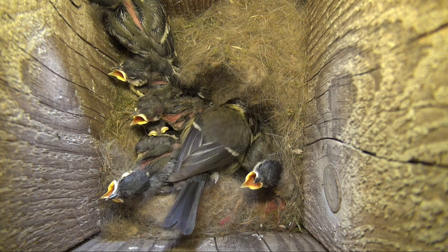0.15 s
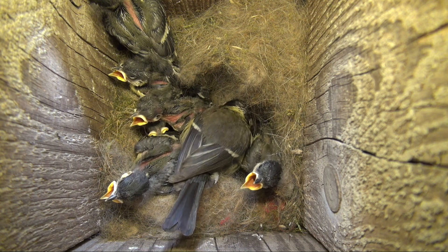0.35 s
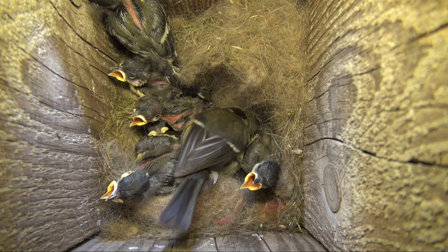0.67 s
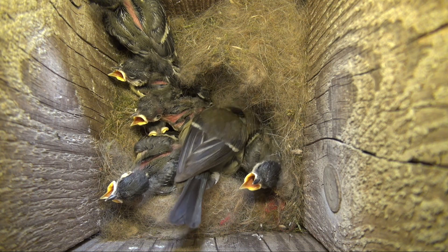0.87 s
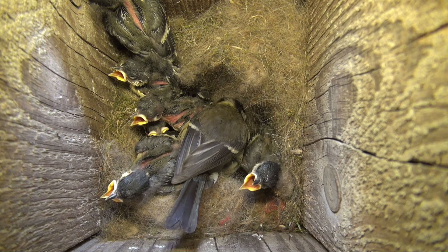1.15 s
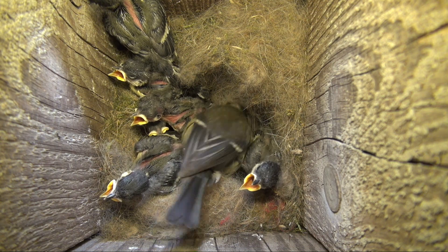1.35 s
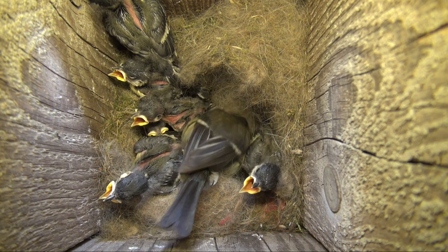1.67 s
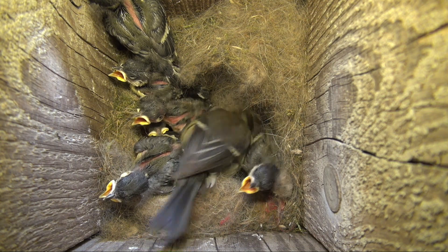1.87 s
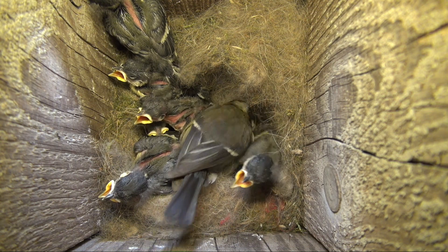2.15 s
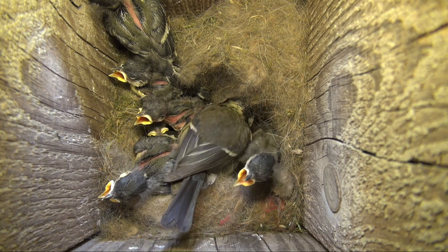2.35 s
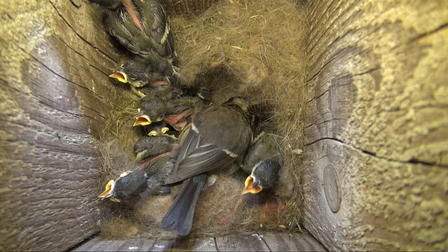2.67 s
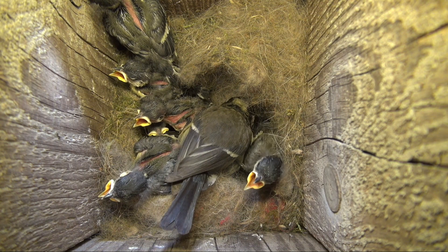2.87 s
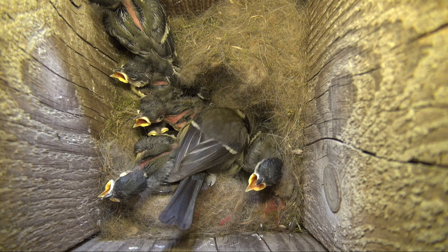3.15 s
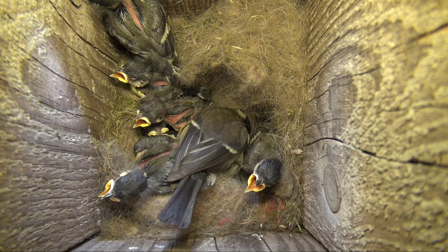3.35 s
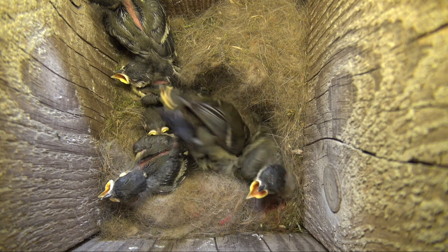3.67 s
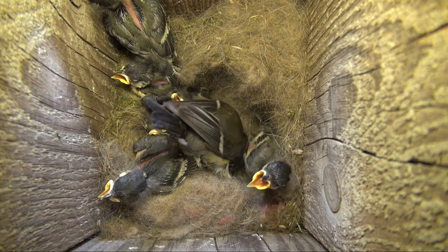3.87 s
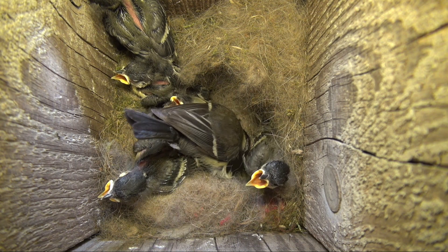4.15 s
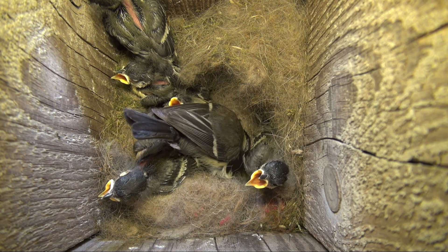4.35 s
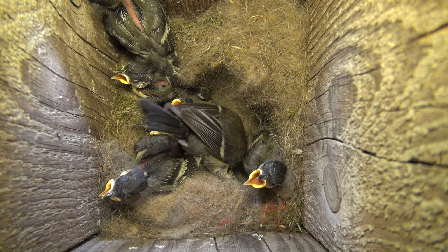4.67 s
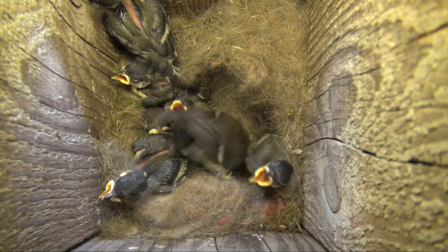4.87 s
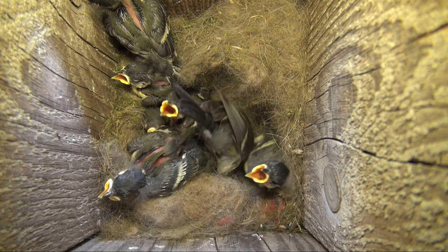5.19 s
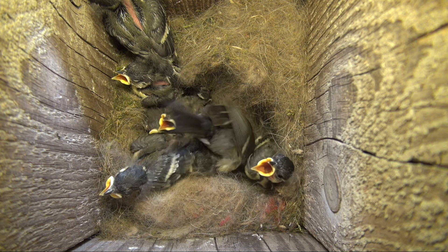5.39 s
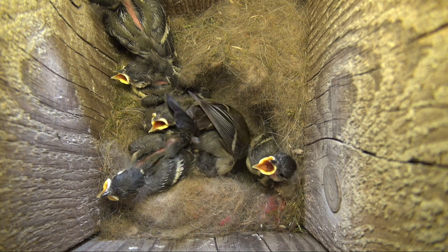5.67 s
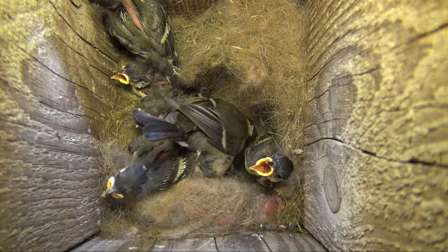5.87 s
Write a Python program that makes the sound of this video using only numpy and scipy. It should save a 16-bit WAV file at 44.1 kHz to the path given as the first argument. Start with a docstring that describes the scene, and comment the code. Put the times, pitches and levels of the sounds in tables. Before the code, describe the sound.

Loud begging starts immediately in a close, dry wooden nest box. A rasping cheep of about 0.3 seconds opens, joined at 0.1 by a brighter, higher trill and a faint feather rustle. Sharp two-toned cheeps around 6 kHz continue at 0.4, 0.9, 1.05 and 1.25, with more high trills at 0.5 and 1.0 and a thin peep near 1.15. A longer buzzy call comes at 1.5, then short calls from 1.9 to 2.9, one stretched at 2.3. A weaker trill sounds at 3.1; after a small gap, calls resume at 3.5 with another trill and soft rustle. Airy peeps appear near 4.1, 4.7, 5.3 and 5.8. Clean cheeps cluster from 4.4, a long rasp follows at 5.1 with a rustle, and final cheeps and a rough trill close at 5.5 to 5.8. Throughout, a faint engine-like hum throbs about twenty times a second over low rumble and slight hiss.

```python
"""From the first instant nestlings beg in a wooden nest box, right under a stereo microphone.
Each loud call is two whistles from the two sides of the syrinx: they beat, split apart and break into a rasp.
A higher chick soon trills with a swinging upper voice, and the parent shifts with a grainy noise rustle.
After a second a weak chick adds thin, airy peeps; the calls and rustles return to the end.
All along, something like an idling engine hums and throbs outside, over low rumble and faint hiss."""
import sys
import numpy as np
from scipy import signal
from scipy.fft import rfft, irfft, next_fast_len
from scipy.io import wavfile
from scipy.ndimage import uniform_filter1d, minimum_filter1d, map_coordinates

SR = 44100
rng = np.random.default_rng(int(sys.argv[2]) if len(sys.argv) > 2 else 0)


def digitize_waveform(pressure):
    """Quantize a signal to 16-bit integers and store it at the path in sys.argv[1].

    Rows of a 2-D input are taken as channels; values are limited to [-1, 1].
    """
    field = np.atleast_2d(pressure).T
    bounded = np.clip(field, -1, 1)
    quanta = np.round(bounded * 32767).astype(np.int16)
    wavfile.write(sys.argv[1], SR, quanta)


N = 265923  # samples

# begging calls: (start [s], length [s], base pitch [Hz], pitch drift over the call [Hz], base level [dB],
#   swell over the call [dB], opening scoop [Hz], pure opening [s], base gap down to the second voice [Hz],
#   base roughness [0-1], screech after the start [s], screech half length [s], screech extra gap [Hz],
#   low closing hook [s])
BEG_CALLS = [ (0.006, 0.28, 6584, 245, -17, -2.5, 599, 0.01067, 258.2, .3, 0.066, .045, 201.8, 0),
             (0.405, 0.11, 6080, 204, -18, -3, 597, 0.01625, 292, 0.5, .055, 0.0083, 500, 0.0063),
             (0.86, 0.12, 6350, -200, -18, -4.5, 402, 0.023, 388, 0.7, .06, .028, 453, 0),
             (1.057, 0.104, 6240, -300, -16.5, 14, 700, 0.0044, 400, 0.45, .012, 0.013, 150, 0.0031),
             (1.261, 0.099, 6100, 151.5, -16.5, 3, 397.5, .008, 402, 0.46, .013, 0.005, 392, 0.013),
             (1.472, 0.3, 6600, 98.5, -18.5, -1.5, 3, .008, 282.3, 0.29, 0.061, .06, 297.4, 0.0016),
             (1.928, 0.13, 6340, -9, -17.5, 2.5, 792, 0.01, 472, 0.5, 0.024, .008, 581, 0.0017),
             (2.19, 0.11, 6260, 145, -13.5, 8, 502.5, 0.014, 157.6, 0.4, 0.093, 0.011, 415, 0.00026),
             (2.283, 0.2547, 6510, 548, -18.5, 9.5, 3, .002, 316.7, .2, .01, 0.0255, 391, 0.0022),
             (2.717, 0.08, 6210, 502, -14.5, 13, 401.5, 0.017, 161, .3, .024, .005, 200, 0.0071),
             (2.897, 0.086, 6136, 94, -15.5, -1.5, 791, .007, 291, 0.37, 0.023, .007, 385, 0.013),
             (3.463, 0.13, 6796, 93.5, -19.5, -7, 398.5, .012, 500, 0.7, .05, 0.036, 206, 0.0021),
             (3.653, 0.16, 6180, 148.5, -20, -1, 160, .009, 230, 0.41, .097, .024, 361, 0.0013),
             (3.930, 0.14, 6230, -150, -14, -2.5, 360.5, .022, 111, 0.14, .11, 0.018, 455, 0.0031),
             (4.433, 0.099, 6520, -300, -17, 11.5, 107, .006, 345, 0.03, .042, .018, 199, 0.00026),
             (4.619, 0.099, 6200, -200, -17, 10.5, 97.5, 0.0038, 328, 0.21, 0.01, 0.0098, 339, 0.0037),
             (4.804, 0.097, 6205, -100, -15.5, 8.5, 143, .009, 399, 0.16, .018, 0.0062, 524, 0.0032),
             (5.049, 0.070, 6020, -200, -21.5, 0.5, 401, 0.0033, 134, .25, .016, 0.0034, 200, 0.0025),
             (5.104, 0.24, 6663, 307, -17.5, 7, -4, 0.0016, 280, 0.23, 0.044, .04, 206.8, 0.0021),
             (5.489, 0.088, 6310, 503.5, -15, -6, 800.5, 0.012, 203.5, .35, .025, .008, 410, .009),
             (5.667, 0.11, 6150, -250, -13.5, 1.5, 394, .008, 333, 0.14, .088, .012, 150, 0.0061), ]
# trilled calls: (start [s], length [s], base pitch [Hz], pitch drift [Hz], base level [dB], swell [dB],
#   base gap down to the second voice [Hz], base roughness [0-1], slow swings [per s])
TRILL_CALLS = [ (0.075, 0.15, 8330, -300, -12, -4, 1367, 0.48, 7.1),
               (0.522, 0.15, 8190, -100, -16, -8, 1166, 0.23, 8.8),
               (0.974, 0.12, 8370, -150, -15.5, -1.5, 1160, 0.32, 26),
               (3.123, 0.12, 8600, 97.5, -21.5, -3.5, 1736, 0.01, 14.4),
               (3.477, 0.13, 8800, -200, -23.5, -7, 1834, .6, 11),
               (4.435, 0.1, 8570, 297, -22.5, -11, 1820, 0.3, 15.2),
               (5.711, 0.13, 8200, -1300, -23.5, 4.5, 743, 1, 8.6), ]
# thin single-voiced peeps: (start [s], length [s], base pitch [Hz], pitch drift [Hz], base level [dB],
#   swell [dB], roughness at the start [0-1])
PEEP_CALLS = [ (1.157, 0.082, 6940, -550, -41, -7, 0.3), (4.058, 0.174, 7250, -3.5, -38, 4.5, 0.7),
              (4.71, 0.09, 7180, -500, -36.5, 5.5, 0.5), (5.345, 0.066, 7530, -400, -44, 0.5, 0.8),
              (5.838, 0.098, 7590, 101.5, -37, 0.5, 0.4), ]
# forced hard, the two voices are pulled wide apart:
#   (widest at [s], build-up [s], extra gap [Hz], change of level [dB])
VOICE_SPLITS = [(0.508, 0.039, 1990, 2), (1.158, 0.017, 2400, -11.5), (1.548, .016, 992, 0),
                (2.028, 0.035, 1936, -3), (3.738, .007, 615, 7), (5.565, 0.028, 1900, -8)]
# air rushing through the open beak: (frequency [Hz], relative density [dB per Hz])
BEAK_AIR = [(1200, -15), (2600, -13), (3300, -5.5), (4200, -4.5), (5000, -8.5), (5700, 3.5), (6700, 4),
            (7900, 7.5), (8800, -5.5), (9700, -2.5), (10600, -11.5), (12300, -11.5), (13400, -49),
            (14600, -67)]
# how the box colours the loud chicks on the way to the microphone: (frequency [Hz], gain [dB])
BOX_COLOUR = [(4500, -4.5), (5050, -3), (5650, -1.5), (7100, 2.5), (7400, 0.5), (7700, 3), (13300, -13),
              (14400, -23.5)]
# the loud chicks turn their heads: (time [s], left minus right [dB])
HEAD_TURNS = [(4.2, 1.5), (5.399, 0)]
# the box walls give each capsule its own pattern of standing waves:
# (frequency [Hz], left minus right [dB])
CAPSULE_BALANCE = [(2800, -2.5), (3800, -0.6), (4400, -0.5), (5300, 0), (5780, -5.5), (6100, 1),
                   (6750, 0.5), (7600, 4), (8700, -0.5), (11000, 3), (11800, -6), (12900, 0.5)]
# (frequency [Hz], lead of the left capsule [radians])
CAPSULE_LEAD = [(2000, -11), (3300, -1.62), (5000, 1.1), (5850, .5), (6250, 1.31), (7200, 0.87),
                (8600, 1.15), (10600, 1.27), (12000, 0.2), (13200, 2.4), (14000, 1.5)]
# the parent shifts: (time [s], half length [s], level [dB])
PARENT_SHIFTS = [(0.119, 0.084, -45), (3.495, 0.038, -47.5), (5.165, 0.056, -46.5)]
# engine tones and a faint whine: (frequency [Hz], relative level [dB])
ENGINE_TONES = [(45, -65.5), (90, -56), (134.6, -51), (177, -50.5), (195, -51.5), (299, -56), (490, -54.5),
                (568, -56), (2900, -69)]
# resonances that the engine's puffs ring: (frequency [Hz], width [Hz], relative level [dB])
THROB_RESONANCES = [(495, 13, -39.5), (568.2, 23, 12.5), (655, 80, -42.5), (1047, 23.3, 4)]
# rise and fall of the engine: (time [s], relative hum level [dB], relative throb level [dB])
ENGINE_LEVELS = [(0.3, -46, -49.5), (1.59, -42, -45.5), (2.51, -45.5, -50), (5.46, -42.5, -43.5),
                 (5.52, -47.5, -51), (5.7, -42.5, -45)]
# outdoor background: (frequency [Hz], relative density [dB per Hz])
OUTDOOR_SPECTRUM = [(25, -8), (60, -8.5), (130, -3), (200, -1.5), (370, -15), (650, -7), (900, -20),
                    (1250, -20), (2300, -29), (2900, -23.5), (4500, -33.5), (8000, -35.5), (12500, -40.5),
                    (15500, -43)]
# how alike left and right are outdoors: (frequency [Hz], likeness [0-1])
OUTDOOR_LIKENESS = [(25, 0.68), (60, 0.91), (150, .97), (400, .95), (600, .97), (1200, .95), (3000, 0.9),
                    (6000, .75), (12000, .5)]

ATTACK_S = 0.0025  # a voice starts and stops within this time
SCOOP_S = .012  # a begging call slides from its scoop to its pitch
OPENING_DB = -2.5  # it opens as one pure, softer whistle, before the second voice comes in
FALL_HZ, FALL_S = 844, 0.012  # the pitch falls as the air runs out
RELEASE_DB, RELEASE_S = 19.5, 0.0081  # and so does the level
# a screech: roughness, loss of level, share of its gap that lifts the upper voice
SCREECH_ROUGH, SCREECH_DIP_DB, SCREECH_LIFT = 1, 1, 0.83
# some begging calls end by snapping to a low register, which fades down to HOOK_DB
HOOK_HZ, HOOK_DB, HOOK_FADE_DB_PER_S = 4495, -29.5, 501.5
# a split: share taken by the upper voice, time held at the widest, gap scale over which the voices clear
SPLIT_LIFT, SPLIT_HOLD_S, SPLIT_CLEAR_HZ = 0.96, .003, 1700
# uneven breath pressure: a push is higher, louder and cleaner (sizes per unit of push)
WARBLE_RATE, WARBLE_HZ, WARBLE_DB, WARBLE_ROUGH = 75, 109.5, 2.08, 0.27
# the two voices drift against each other: share of their gap, random turns a second
GAP_WAVER, GAP_WAVER_RATE = .22, 70
DOUBLING_THRESHOLD, DOUBLING_FITS = 1.236, .25  # strain where the period doubles, and its random swing
AIR_PULSING = 0.3  # share of the rushing air that pulses with the beats of the voices
# a trill: slow swing and the lower voice's share of it, weaker ends, closing fall
SWING_HZ, SWING_LOWER, TRILL_ARCH_DB, TRILL_FALL_HZ = 337, .5, 1, 1305
# it starts weaker and rougher, and roughens at the bottom of each swing
TRILL_ONSET_S, TRILL_ONSET_DB, TRILL_STRAIN = .018, -3.5, .35
# a peep is lower and weaker at both ends, and loses this share of its roughness
PEEP_ARCH_HZ, PEEP_ARCH_DB, PEEP_CLEARS = 300, 0.5, 1
TOP_HZ = 15800  # nothing is kept from here up


def amp(db):
    """Decibels to gain."""
    return 10 ** (np.asarray(db) / 20)


def unit(x):
    """Scale to rms 1."""
    return x / np.sqrt(np.mean(np.abs(x) ** 2) + 1e-20)


def along(points, hz):
    """Read (frequency [Hz], value) points on a log axis."""
    f, v = np.transpose(points)
    return np.interp(np.log(hz + 1), np.log(f + 1), v)


def wobble(rate, size):
    """A smooth random curve, rate knots a second."""
    knots = rng.standard_normal(int(size * rate / SR) + 4)
    return map_coordinates(knots, [1 + np.arange(size) * rate / SR])


def filtered(x, response):
    """x times a complex response of frequency."""
    n = x.shape[-1]
    m = next_fast_len(n + 8192)
    spectrum = rfft(x, m) * response(np.fft.rfftfreq(m, 1 / SR))
    return irfft(spectrum, m)[..., :n]


def turns(hz):
    """Running phase, in radians, of a moving frequency."""
    return 2 * np.pi * np.cumsum(hz) / SR


def span(start, length):
    """For each sample of a call: seconds since its start, seconds left, and its place from -1/2 to 1/2."""
    age = np.arange(round(length * SR)) / SR
    return age, length - age, age / length - .5


def whistle(hz, rough, jitter_hz=240, chaos_rate=1100):
    """One side of the syrinx: a complex sine that flutters and, when forced, turns chaotic."""
    n = len(hz)
    jitter_rate, most_chaos = 400, .55
    phase = turns(hz + jitter_hz * rough * wobble(jitter_rate, n))
    share = most_chaos * rough ** 2
    swirl = unit(wobble(chaos_rate, n) + 1j * wobble(chaos_rate, n))
    return (np.sqrt(1 - share) + np.sqrt(share) * swirl) * np.exp(1j * phase)


def beak_air(voice):
    """Turbulent air in the open beak: shaped noise that flutters and partly pulses with the voice."""
    n = len(voice)
    hiss = filtered(rng.standard_normal(n), lambda hz: amp(along(BEAK_AIR, hz)))
    pulsing = 1 - AIR_PULSING + AIR_PULSING * np.abs(voice) ** 2
    return unit(hiss * amp(1.8 * wobble(300, n)) * pulsing)


def call(start_s, pitch, gap, db, rough, second_db, rasp_db, overtone_db, trill_hz, trill_depth_hz,
         undertone_db=-40, lock_hz=300, split_hz=520):
    """One call, placed in time: two voices, their undertone and overtones, and rushing air."""
    n = len(pitch)
    t = np.arange(n) / SR
    rough = np.clip(rough, 0, 1)
    # the muscles quiver: pitch warbles unevenly, and at each low point the voice weakens and roughens
    quiver = np.sin(turns(trill_hz * (1 + .2 * wobble(40, n))))
    push = wobble(WARBLE_RATE, n) * np.sqrt(2 * rough)
    trill = trill_depth_hz * quiver + WARBLE_HZ * push
    gain = amp(db + 2 * quiver * np.sqrt(rough) + WARBLE_DB * push)
    rough = np.clip(rough * (1 - quiver / 4 - WARBLE_ROUGH * push), 0, 1)
    # close in pitch the two sides lock into one tone; apart, they beat
    gap = gap + GAP_WAVER * np.minimum(gap, split_hz) * wobble(GAP_WAVER_RATE, n)
    second = amp(second_db) * np.minimum(np.abs(gap) / lock_hz, 1)
    voice = whistle(pitch + trill, rough) + second * whistle(pitch - gap + trill / 2, rough ** 2)
    # the shared airflow saturates, which sets side tones one gap above and below
    voice = unit(voice / (np.abs(voice) ** 2 + .3) ** .14)
    # pulled apart, the voices double their period in fits: a line an octave down
    strain = gap / split_hz + rough / 2
    fits = DOUBLING_FITS * wobble(WARBLE_RATE, n)
    doubling = np.clip(strain - DOUBLING_THRESHOLD + fits, 0, 1) * amp(1.5 * wobble(110, n))
    voice = voice + amp(undertone_db) * doubling * whistle(pitch / 2 + trill, rough / 2)
    # all these tones mix into a ragged band of overtones
    ragged = whistle(np.zeros(n), np.sqrt(rough))
    voice = voice + amp(overtone_db) * (rough + 1) / 2 * voice ** 2 * ragged
    rasp = amp(rasp_db) * rough * beak_air(voice)
    edges = np.clip(np.minimum(t, t[-1] - t) / ATTACK_S, 0, 1)
    sound = (np.sqrt(2) * voice.real + rasp) * gain * edges
    return np.pad(sound, (max(round(start_s * SR), 0), N))[:N]


def split(t):
    """Extra gap [Hz] between the voices and change of level [dB]: the gap builds up, then snaps shut."""
    gap, level_db = 0, 0
    for widest_s, build_s, extra_hz, change_db in VOICE_SPLITS:
        since = t - widest_s
        opening = np.exp(-(np.minimum(since, 0) / build_s) ** 2)
        gap = gap + extra_hz * opening * (t < widest_s + SPLIT_HOLD_S)
        level_db = level_db + change_db * np.exp(-(since / build_s) ** 2)
    return gap, level_db


def beg_shape(start, length, hz, drift_hz, level_db, swell_db, scoop_hz, pure_s, gap_hz, roughness,
              screech_s, screech_half_s, screech_hz, hook_s):
    """A begging call's pitch, gap, level, roughness: pure scoop, two-voiced hold with screech, fall."""
    age, left, place = span(start, length)
    opened = 1 - np.exp(-(age / pure_s) ** 6)
    screech = np.exp(-((age - screech_s) / screech_half_s) ** 2)
    apart, split_db = split(start + age)
    closing = np.exp(-np.maximum(left - hook_s, 0) / FALL_S)
    pitch = hz + drift_hz * place + scoop_hz * np.exp(-age / SCOOP_S) - FALL_HZ * closing
    pitch = pitch + SCREECH_LIFT * screech_hz * screech + SPLIT_LIFT * apart
    gap = opened * (1 - closing) * (gap_hz + screech_hz * screech) + apart
    rough = opened * (roughness + (SCREECH_ROUGH - roughness) * screech)
    rough = rough * np.exp(-(apart / SPLIT_CLEAR_HZ) ** 2)  # far apart, the voices clear
    db = level_db + swell_db * place + OPENING_DB * (1 - opened) - SCREECH_DIP_DB * screech + split_db
    db = db - RELEASE_DB * np.exp(-(left - hook_s / 2) / RELEASE_S)
    # a hook too short to sound is skipped
    hook = (left < hook_s) & (hook_s > ATTACK_S)
    pitch = np.where(hook, HOOK_HZ, pitch)
    gap = np.where(hook, 0, gap)
    db = np.where(hook, HOOK_DB + HOOK_FADE_DB_PER_S * left, db)
    return pitch, gap, db, rough


def beggars():
    """The loud chicks near 6.5 kHz: paired syrinx voices from clean whistle to screech."""
    x = sum(call(row[0], *beg_shape(*row), second_db=-5.5, rasp_db=-8, overtone_db=-15.5,
                 trill_hz=51.8, trill_depth_hz=72, undertone_db=-13.5) for row in BEG_CALLS)
    x = filtered(x, lambda hz: amp(along(BOX_COLOUR, hz)))
    lean_db = np.interp(np.arange(N) / SR, *np.transpose(HEAD_TURNS))
    return x * amp(1.03 + np.array([lean_db, -lean_db]) / 2)


def trill_shape(start, length, hz, drift_hz, level_db, swell_db, gap_hz, roughness, swing_rate):
    """A trilled call: the upper voice swings over a steadier lower one, and both fall at the end."""
    age, left, place = span(start, length)
    swing = np.cos(2 * np.pi * swing_rate * age)
    onset = np.exp(-(age / TRILL_ONSET_S) ** 4)
    closing = np.exp(-left / FALL_S)
    pitch = hz + drift_hz * place + SWING_HZ * swing - TRILL_FALL_HZ * closing
    gap = (gap_hz + (1 - SWING_LOWER) * SWING_HZ * swing) * (1 - closing / 2)
    db = level_db + swell_db * place + TRILL_ONSET_DB * onset
    db = db - TRILL_ARCH_DB * (2 * place) ** 2 - RELEASE_DB * np.exp(-left / RELEASE_S)
    return pitch, gap, db, roughness + TRILL_STRAIN * (onset + (1 - swing) / 2)


def triller(beak_hz=9700):
    """A higher chick whose upper voice warbles quickly."""
    x = sum(call(row[0], *trill_shape(*row), second_db=-5.5, rasp_db=-14.5, overtone_db=-35.5,
                 trill_hz=42.74, trill_depth_hz=250) for row in TRILL_CALLS)
    return filtered(x, lambda hz: 1 / (1 + (hz / beak_hz) ** 20))  # its beak passes little above the trill


def peep_shape(start, length, hz, drift_hz, level_db, swell_db, roughness):
    """A peep: one voice in a shallow arch, airy at first and clearer at the end."""
    age, left, place = span(start, length)
    ends = (2 * place) ** 2
    pitch = hz + drift_hz * place - PEEP_ARCH_HZ * ends
    db = level_db + swell_db * place - PEEP_ARCH_DB * ends
    return pitch, 0, db, roughness * (1 - PEEP_CLEARS * age / length)


def peeper():
    """A weak chick with one thin, airy voice: with no gap, the second voice is silent."""
    return sum(call(row[0], *peep_shape(*row), second_db=0, rasp_db=4.5, overtone_db=-26.5,
                    trill_hz=40.0, trill_depth_hz=30) for row in PEEP_CALLS)


def placed(x):
    """The chicks sit off centre: each frequency reaches the two capsules with its own level and lead."""
    side = np.array([[1], [-1]]) / 2

    def capsules(hz):
        return amp(side * along(CAPSULE_BALANCE, hz)) * np.exp(1j * side * along(CAPSULE_LEAD, hz))
    return filtered(x, capsules)


def box(x, t60=0.046, wet_db=-15):
    """The close wooden walls answer at once; moss and feathers soak it up (t60 in seconds)."""
    t = np.arange(SR // 20) / SR
    tail = rng.standard_normal((2, len(t))) * amp(-60 * t / t60) * (t > .0006)
    tail /= np.linalg.norm(tail, axis=1, keepdims=True)
    return x + amp(wet_db) * signal.fftconvolve(x, tail, axes=1)[:, :N]


def rustle(centre_hz=1500, grain_db=4):
    """Feathers brush the moss and the wall in short, grainy swells of band-passed noise."""
    t = np.arange(N) / SR
    swell = sum(amp(db) * np.exp(-((t - s) / half) ** 2) for s, half, db in PARENT_SHIFTS)
    grains = rng.standard_normal(N) * amp(grain_db * wobble(250, N))
    return swell * unit(filtered(grains, lambda hz: hz / (centre_hz + hz * (hz / centre_hz) ** 2)))


def engine(throb_hz=21.32, throb_db=-1, hum_db=-2.0, turbulence=0.41):
    """Like a far engine: wavering low tones, and regular puffs ringing in a few resonances."""
    s, *columns = np.transpose(ENGINE_LEVELS)
    hum_level, throb_level = (np.interp(np.arange(N) / SR, s, c) for c in columns)
    tones = 0
    for hz, db in ENGINE_TONES:
        level = amp(db + 2.5 * wobble(4, N))
        tones = tones + level * np.sqrt(2) * np.sin(turns(hz * (1 + .007 * wobble(9, N))))
    # each cycle gives one knock and a burst of turbulent noise around it
    cycle = turns(throb_hz * (1 + 0.004 * wobble(3, N)))
    knocks = np.diff(np.floor(cycle / (2 * np.pi)), prepend=0)
    bursts = np.exp(1.5 * np.cos(cycle)) * rng.standard_normal(N)
    puffs = unit(knocks) + turbulence * unit(bursts)

    def body(f):
        ringing = sum(amp(db) * 1j * f * width / (centre * centre - f * f + 1j * f * width)
                      for centre, width, db in THROB_RESONANCES)
        return ringing / (1 + (f / 1300) ** 4)
    hum = amp(hum_db + hum_level - hum_level.mean()) * tones
    return hum + amp(throb_level + throb_db) * unit(filtered(puffs, body))


def outdoors(level_db=-43):
    """Steady low rumble and faint hiss: nearly mono from about 60 to 1200 Hz, wider below and in the treble."""
    def mid_side(hz):
        angle = np.arccos(np.clip(along(OUTDOOR_LIKENESS, hz), -1, 1)) / 2
        return amp(along(OUTDOOR_SPECTRUM, hz)) * [np.cos(angle), np.sin(angle)]
    mid, side = filtered(rng.standard_normal((2, N)), mid_side)
    return amp(level_db) * unit(np.array([mid + side, mid - side]))


def scene():
    """The brood and its parent in the box, over the sounds from outside."""
    chicks = beggars() + triller() + peeper()
    return box(placed(chicks)) + rustle() + engine() + outdoors()


def record(dry, ceiling=0.55, offset=0.031):
    """Limit the peaks with one smoothed gain for both sides, cut the top and sit a little off zero."""
    size = SR // 500
    needed = np.minimum(1, ceiling / (np.abs(dry).max(axis=0) + 1e-9))
    gain = uniform_filter1d(minimum_filter1d(needed, 2 * size), size)
    return filtered(dry * gain, lambda hz: hz < TOP_HZ) + offset


dry = scene()
out = record(dry)
digitize_waveform(out)
```